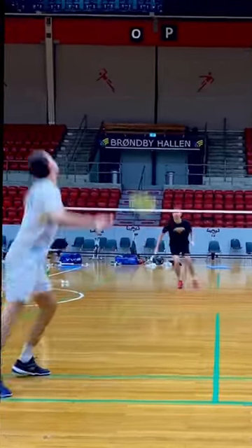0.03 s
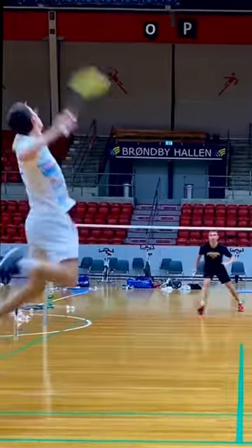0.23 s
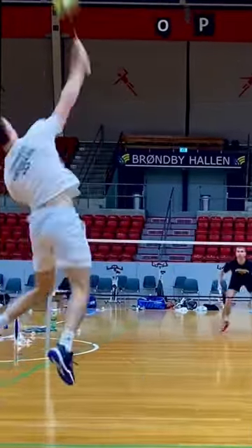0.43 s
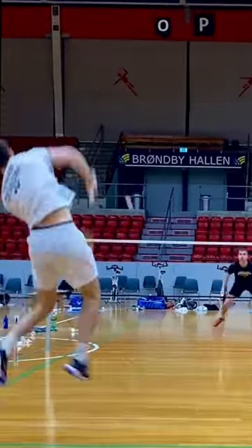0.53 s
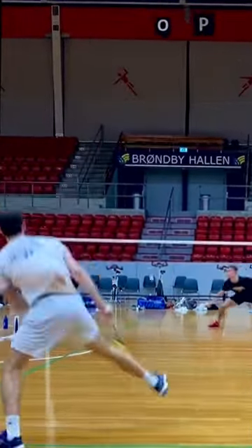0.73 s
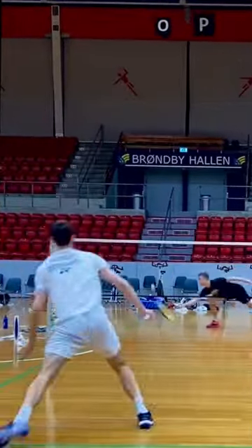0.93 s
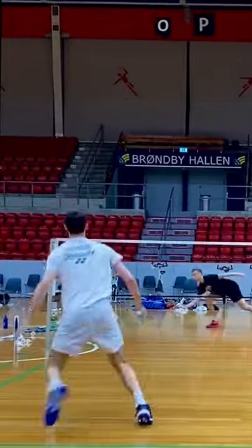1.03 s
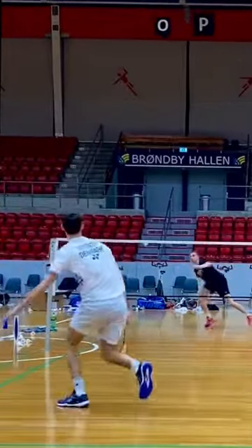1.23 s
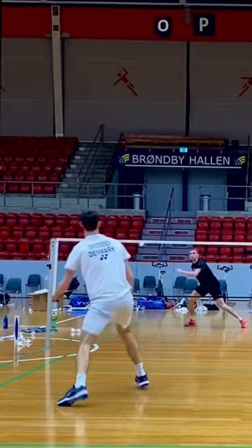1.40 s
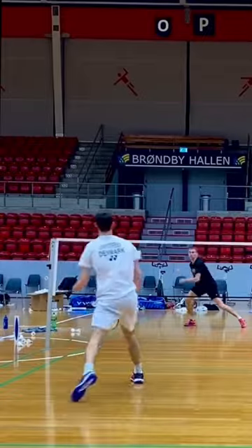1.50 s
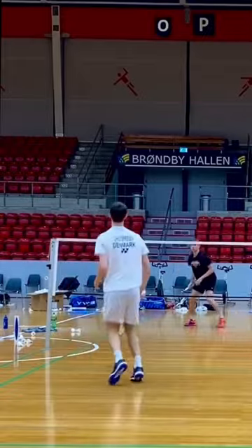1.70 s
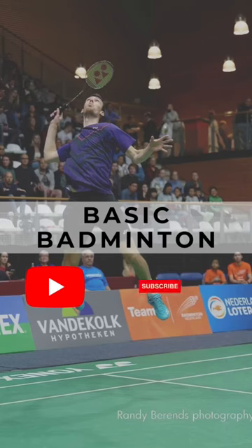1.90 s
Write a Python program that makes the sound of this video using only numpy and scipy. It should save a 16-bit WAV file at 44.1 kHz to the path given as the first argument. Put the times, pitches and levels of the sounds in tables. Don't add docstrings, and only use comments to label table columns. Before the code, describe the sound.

One explosive badminton smash with a bright stringy crack, after soft take-off steps; a long hall echo follows, with deep landing thuds and brief sole squeaks on a wooden floor, heard close behind the player.

```python
import sys
import numpy as np
from scipy import signal
from scipy.fft import rfft, irfft
from scipy.io import wavfile
from scipy.ndimage import uniform_filter1d

SR = 44100
rng = np.random.default_rng(int(sys.argv[2]) if len(sys.argv) > 2 else 0)


def bounce(signal):
    frames = np.transpose(np.atleast_2d(signal))
    limited = np.clip(frames, -1, 1)
    pcm = np.round(limited * 32767).astype(np.int16)
    wavfile.write(sys.argv[1], SR, pcm)


def level_to_linear(level):
    exponent = np.asarray(level, float) / 20
    return 10 ** exponent


N = 85995

SMASH_S = .4572

# f/Hz, T60/s
HALL_T60 = [(150, 5.5), (500, 6), (1200, 4.), (2500, 3), (3600, 2.), (5200, 1.5), (10000, 1.28),
            (16000, 2.5)]


def times():
    return np.arange(N) / SR


def rms_one(x):
    return x / np.sqrt(np.mean(x ** 2) + 1e-20)


def at_hz(points, hz):
    table_hz, values = np.array(points).T[:2]
    return np.interp(np.log(hz), np.log(table_hz), values)


def band(x, low_hz, high_hz):
    edges = [low_hz, min(high_hz, SR * .45)]
    return signal.sosfilt(signal.butter(2, edges, "band", fs=SR, output="sos"), x)


def hump(start, length):
    return np.sin(np.pi * np.clip((times() - start) / length, 0, 1)) ** 2


def fall(start, decay):
    age = times() - start
    return (age >= 0) * np.exp(-np.maximum(age, 0) / decay)


def diffuse(spectrum, low_hz, high_hz, t60=None):
    # f/Hz, correlation/1
    likeness = [(60, 0.99), (130, 1), (290, 0.92), (640, 0.083), (1400, .3), (3100, 0.25), (6800, 0.28),
                (15000, 0.88)]
    edges = low_hz * 2 ** np.arange(0, np.log2(high_hz / low_hz) + .3, 1 / 3)
    white = rng.standard_normal((2, 2, N))
    out = 0
    for k, (low, high) in enumerate(zip(edges, edges[1:])):
        mid, side = band(white[k % 2], low, high)
        hz = np.sqrt(low * high)
        alike = np.clip(at_hz(likeness, hz), -1, 1)
        decay_db = 60 * times() / at_hz(t60, hz) if t60 else 0
        gain = level_to_linear(at_hz(spectrum, hz) - decay_db)
        out = out + gain * (np.sqrt(1 + alike) * mid + np.sqrt(1 - alike) * side * [[1], [-1]])
    return out


def hall_air():
    # f/Hz, level/dB per Hz
    earlier = [(120, -43), (200, -18.5), (509, -5), (2610, -12.5), (5940, -18), (6880, -9.5), (7270, -56.5),
               (9400, -26.5), (16000, -40)]
    # f/Hz, level/dB per Hz
    steady = [(120, -31), (200, 2.5), (1590, -6), (2800, -4), (4150, -22.5), (5550, -13.5), (6700, -35),
              (12000, -41.5), (15600, -69), (22000, -120)]
    tail = level_to_linear(-44.5) * rms_one(diffuse(earlier, 200, 10500, HALL_T60))
    return tail + level_to_linear(-43.5) * rms_one(diffuse(steady, 199.9, 10500))


def hall(x):
    # delay t/s, level/dB over the tail, spread/s
    echoes = [(.008, 3, 0.0047), (0.034, 12.5, 0.0027), (0.074, -5, 0.005), (.124, -18, .003),
              (0.198, 10.5, 0.01)]
    # f/Hz, level/dB
    colour = [(100, -4), (300, -2.5), (600, -5), (1300, 3.5), (2000, -3.5), (3800, 0.5), (5200, -2),
              (12000, -7.5)]
    # f/Hz, bandwidth/Hz, level/dB
    rings = [(445.6, 55, 6), (1371, 360, 4), (2358, 170, -6.5)]
    build_s, grain_db, grain_s = 0.022, 2.5, 0.23
    shape = 1 - np.exp(-(times() / build_s) ** 2)
    for delay, db, spread in echoes:
        shape = shape + level_to_linear(db) * .5 * fall(delay, spread)
    grains = level_to_linear(grain_db * fall(0, grain_s) * rms_one(band(rng.standard_normal(N), 27, 200)))
    response = level_to_linear(-33.5) * shape * grains * diffuse(colour, 98.8, 10500, HALL_T60)
    resonance = 0
    for hz, width_hz, db in rings:
        resonance = resonance + level_to_linear(db) * band(response, hz - width_hz / 2, hz + width_hz / 2)
    return signal.fftconvolve(response + resonance, x[None], axes=1)[:, :N]


def boards():
    # t/s, level/dB
    footwork = [(0.0, -35.5), (0.104, -31.5), (0.302, -39.5), (0.478, -55), (0.718, -23.5), (0.87, -39),
                (1.324, -37), (1.618, -35), (1.7, -40)]
    # f/Hz, level/dB per Hz
    rumble = [(15, -44), (25, -20.5), (70, 1), (140, -6), (172, -5.5), (210, -25.5), (260, -33.5),
              (340, -46.5), (570, -120)]
    # t/s, peak level/dB, f/Hz, length/s
    booms = [(0.153, -24, 106, 0.039), (0.186, -21.5, 105, 0.044), (0.246, -18.5, 91, 0.026),
             (.295, -36, 90, 0.068), (0.332, -22.5, 65.3, 0.11), (0.687, -4.5, 102, 0.025),
             (0.715, -7.5, 76, .035), (.808, -15, 146, .022), (0.825, -6.5, 100.8, 0.049),
             (0.884, -17, 87.96, 0.074), (0.955, -27, 92, 0.034), (1.246, -20, 74, .04),
             (1.519, -11.5, 114.5, 0.017), (1.538, -16, 112, 0.046), (1.629, -21, 83.33, 0.036)]
    swell, sag = .6, 0.27
    ring_db, ring_s = -12.5, 0.074
    s, db = np.transpose(footwork)
    level = level_to_linear(np.interp(times(), s, db))
    out = 0
    for s, db, hz, length in booms:
        age = times() - s
        phase = 2 * np.pi * hz * (age + sag * (age - age ** 2 / length))
        out = out + level_to_linear(db) * hump(s, length) ** swell * np.sin(phase)
        level = level + level_to_linear(db + ring_db) * fall(s + length, ring_s) * .5
    level = uniform_filter1d(level, size=700, axis=-1)
    return band(out + level * rms_one(diffuse(rumble, 25, 260)), 45, 400)


def taps():
    # t/s, peak level/dB, brightness f/Hz
    contacts = [(.149, -31, 1200), (.1785, -24, 3000), (.685, -28, 900), (.808, -24, 1600),
                (.915, -28, 550), (1.513, -18, 2200), (.921, -46, 16000), (1.388, -36, 16000),
                (1.46, -48, 13000), (1.7, -50, 16000)]
    noise = rng.standard_normal(N)
    out = 0
    for s, db, hz in contacts:
        burst = fall(s, .003) * noise
        knock = band(band(burst, hz / 3, hz), hz / 4, hz)
        out = out + level_to_linear(db) * knock / np.abs(knock).max()
    return out


def slide():
    start_s, length_s, start_hz, rise_hz = .236, .05, 14100, 1500
    age = times() - start_s
    rough = rms_one(band(rng.standard_normal(N), 23, 430))
    phase = 2 * np.pi * (start_hz * age + rise_hz * age ** 2 / length_s / 2)
    whistle = rough * np.sin(phase) * np.sqrt(hump(start_s, length_s))
    hiss = rms_one(band(band(rng.standard_normal(N), 14200, 15900), 14200, 15900))
    hiss = hiss * (fall(start_s, 0.077) + .15 * hump(.21, .04))
    return level_to_linear(-34.5) * (whistle + 0.32 * hiss)


def squeaks(rows, sag):
    uneven = 1 + .35 * rms_one(band(rng.standard_normal(N), 100, 600))
    scuff = level_to_linear(-21.5) * rms_one(band(band(rng.standard_normal(N), 2500, 11500), 2000, 12000))
    out = 0
    for s, length, hz, db, octave_db in rows:
        age = times() - s
        phase = 2 * np.pi * hz * (age + sag * (age - age ** 2 / length))
        upper = level_to_linear(-19) * uneven * (np.sin(3 * phase) + .5 * np.sin(4 * phase))
        tone = np.sin(phase) + level_to_linear(octave_db) * np.sin(2 * phase) + upper
        friction = tone * uneven + scuff * (1 + level_to_linear(octave_db))
        out = out + level_to_linear(db) * hump(s, length) ** .7 * friction
    return out


def swish():
    rise = (times() < SMASH_S) * np.exp(np.minimum(times() - SMASH_S, 0) / .012)
    return level_to_linear(-31) * rise * rms_one(band(rng.standard_normal(N), 3000, 13000))


def smash():
    # f/Hz, level/dB, T60/s, delay t/s
    racket = [(307.8, 4, 0.0089, 0.0046), (705.5, 1.5, 0.019, 0.00299), (1016.4, -2, 0.033, 0.0021),
              (1214, -14, 0.012, 0.00218), (1554, -9.5, 0.011, 0.00068), (1824, -8, 0.035, .001),
              (2583, 2, 0.0072, 0.00038), (2890, 0.5, 0.0049, 0.00033), (4550, 0, 0.0034, .003),
              (3900, -9.5, 0.0065, 0.0023)]
    bounce_s, bounce_db = .0035, -6.5
    out = level_to_linear(-9.5) * fall(SMASH_S, 0.0026) * band(rng.standard_normal(N), 1500, 19000)
    for hz, db, t60, delay in racket:
        start = SMASH_S + delay
        ring = fall(start, t60 / np.log(1000)) * np.sin(2 * np.pi * hz * (times() - start))
        out = out + level_to_linear(db) * .5 * ring
    out = out + level_to_linear(bounce_db) * np.roll(out, int(bounce_s * SR))
    return level_to_linear(-6) * 2 * band(out, 180, 19000)


def scene():
    # t/s, length/s, f/Hz, level/dB, octave over fundamental/dB
    near_rows = [(.6112, 0.0072, 2775, -33, 17.5), (.617, 0.0087, 3200, -24, -35),
                 (1.2067, 0.0073, 3505, -21.5, -39), (1.2125, 0.0063, 3022, -24.5, -6),
                 (1.3882, 0.0018, 3333, -17.5, -6.5), (1.39, 0.0073, 3080, -26.5, -12.5)]
    far_rows = [(.154, .011, 2779, -31, 3), (.6165, 0.0098, 2383, -22.5, -2)]
    slap_s, slap_db, slap_low_hz = .0295, -12.5, 1500
    port_lag = -.9
    hit, tap = smash(), taps()
    squeak = squeaks(near_rows, .04)
    far = squeaks(far_rows, .015)
    near = hit + squeak + far + tap
    slap = level_to_linear(slap_db) * band(np.roll(near, int(slap_s * SR)), slap_low_hz, 6000)
    near = near + slap + swish() + slide()
    lag = np.exp(-2j * np.pi * np.fft.rfftfreq(N) * port_lag)
    pair = np.array([irfft(rfft(near) * lag, N), near])
    wet = hall(level_to_linear(-8.5) * hit + level_to_linear(-5.5) * squeak + level_to_linear(0.5) * far + level_to_linear(-16) * tap)
    return pair + wet + hall_air() + boards()


def low_pass(x):
    return signal.sosfilt(signal.butter(12, 16690, fs=SR, output="sos"), x)


def record(dry):
    # low f/Hz, high f/Hz, threshold level/dB per bin
    gates = [(6700, 8300, -58), (12300, 14200, -66), (14200, 15000, -82),
             (15000, 17000, -86)] + [(hz, hz + 500, -90) for hz in range(8300, 12300, 500)]
    end_s, cutoff_hz = 1.773, 16500
    rounded = .9 * np.tanh(dry / .9)
    hz, _, frames = signal.stft(rounded, SR, nperseg=1024)
    for low_hz, high_hz, floor_db in gates:
        rows = (hz >= low_hz) & (hz < high_hz)
        power = np.mean(np.abs(frames[:, rows]) ** 2, axis=(0, 1))
        frames[:, rows] *= power > level_to_linear(2 * floor_db)
    x = signal.istft(frames, SR, nperseg=1024)[1][:, :N]
    x = signal.sosfilt(signal.cheby2(12, 70, cutoff_hz + 600, fs=SR, output="sos"), x)
    mix = x * np.clip((end_s - times()) / .001, 0, 1)
    return low_pass(mix)


dry = scene()
out = record(dry)
bounce(out)
```